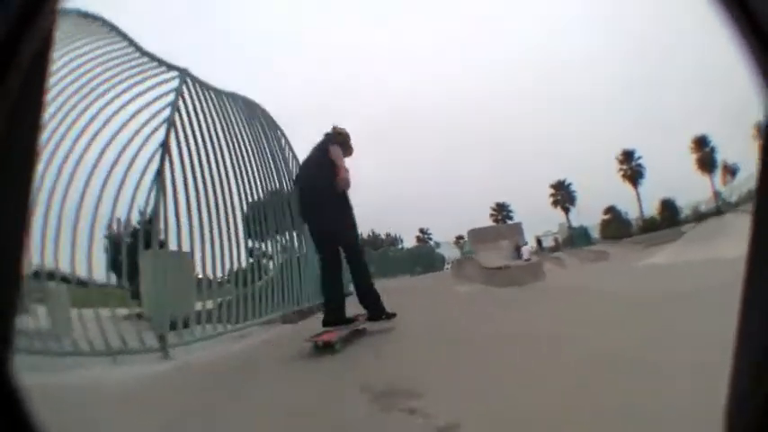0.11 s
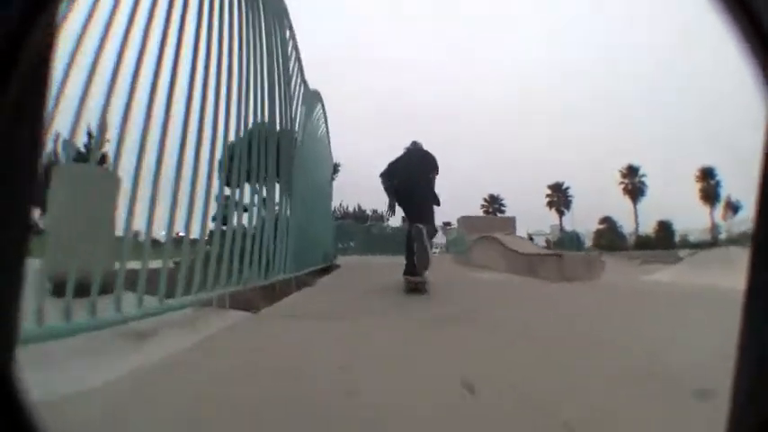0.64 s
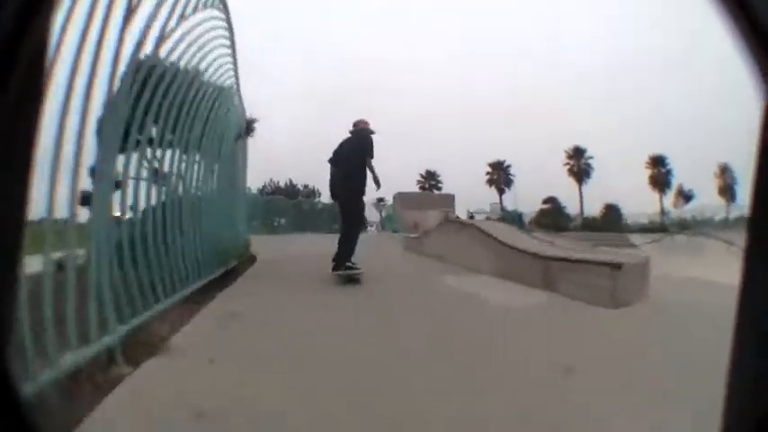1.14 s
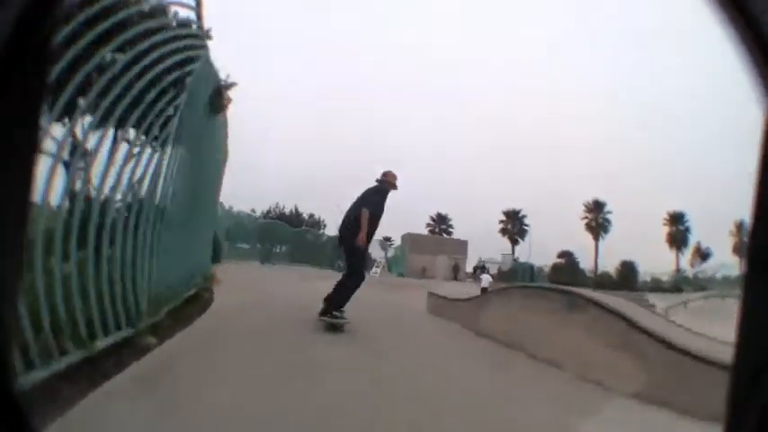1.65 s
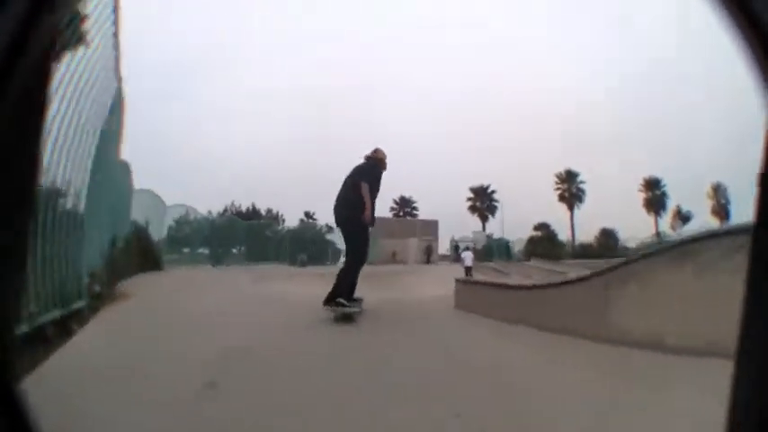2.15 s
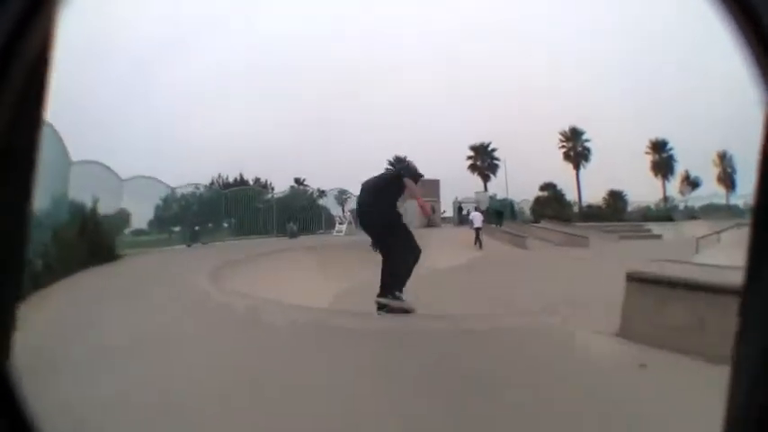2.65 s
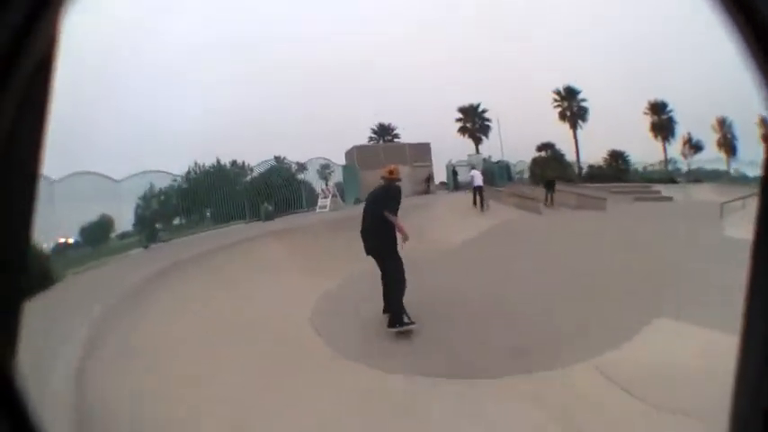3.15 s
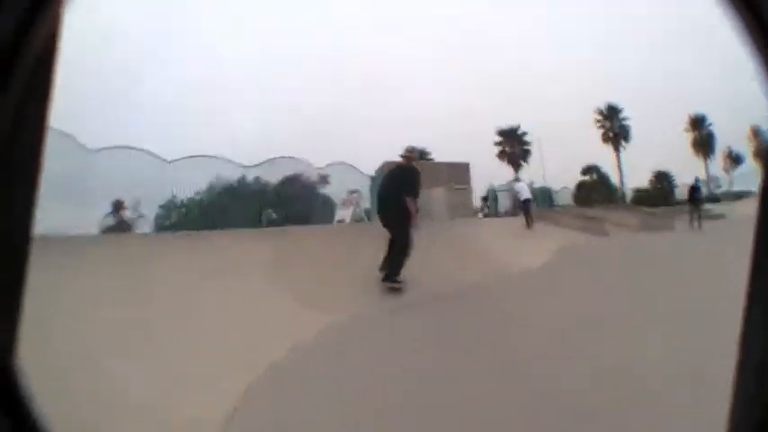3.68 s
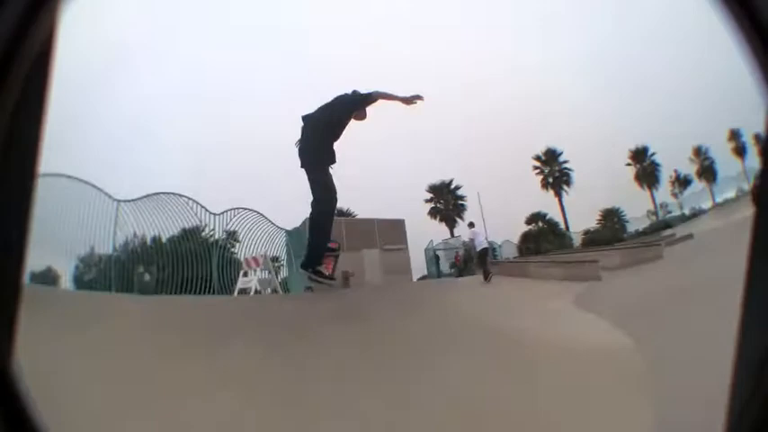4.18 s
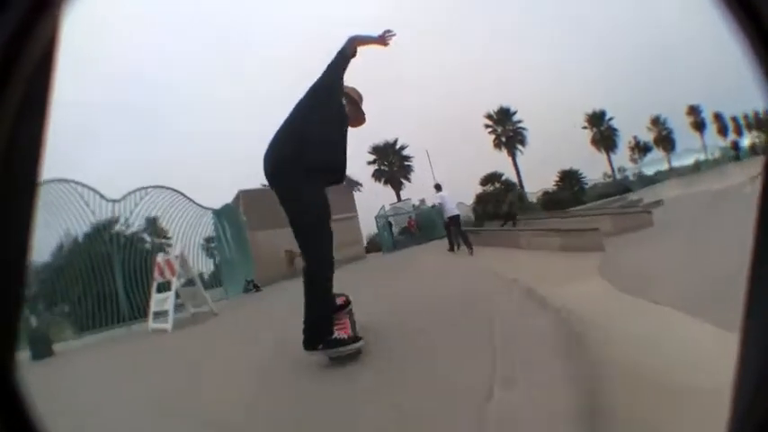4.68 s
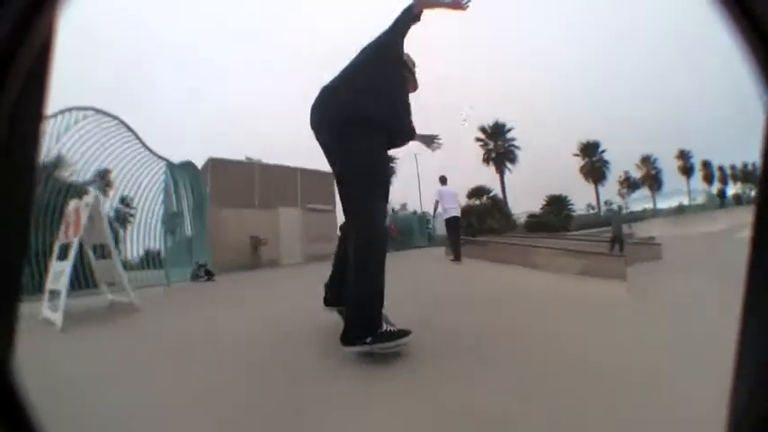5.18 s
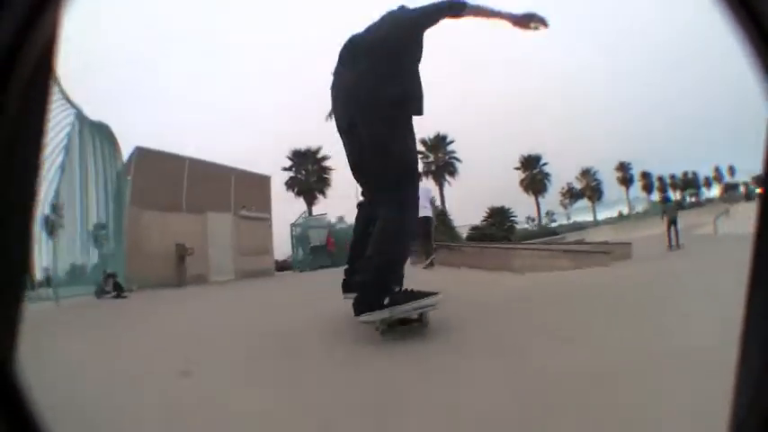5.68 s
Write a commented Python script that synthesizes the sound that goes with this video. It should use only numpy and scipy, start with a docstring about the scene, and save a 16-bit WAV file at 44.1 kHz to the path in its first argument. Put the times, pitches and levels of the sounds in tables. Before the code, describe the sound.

Close, dry sound of skateboarding on open concrete: steady grainy rolling, wavering in tone as weight shifts, with hiss from the bearings. Short rattling clacks of deck and metal trucks come thickly at first, later sparsely. Three hard bursts stand out, the middle one loudest and woodiest, each with the roll briefly dipping around it. Slight wind buffets the microphone, strongest at the very start; the roll carries on to the end.

```python
"""Skateboards roll over smooth concrete in the open, heard close to the ground, among gusts from the start.
Throughout, grit under the wheels shakes deck, trucks and slab, and bearings hiss: noise through resonances.
Quick clacks of seams come first; short rattling forces on the same board make every blow, some with a thump.
Hard blows cluster near 1.2 s, 3.5 s (the strongest knock) and 4.9 s, with sparser clacks between.
The hardest overload the microphone input; lighter clacks and the roll lead to the end."""
import sys
import numpy as np
from scipy import signal
from scipy.fft import rfft, irfft
from scipy.io import wavfile
from scipy.ndimage import uniform_filter1d

SR = 44100
rng = np.random.default_rng(int(sys.argv[2]) if len(sys.argv) > 2 else 0)


def unload_audio(sound):
    """Save the sound as a 16-bit wav file, at the path given as the first command line argument."""
    columns = np.transpose(np.atleast_2d(sound))
    # keep every value between -1 and 1, then stretch to whole-number steps
    steps = np.round(np.clip(columns, -1, 1) * 32767)
    wavfile.write(sys.argv[1], SR, steps.astype(np.int16))


def linear_from_db(decibels):
    """Turn decibels (scalar or array-like) into linear amplitude factors; 0 gives 1."""
    return 10 ** (np.asarray(decibels, float) / 20)


N = 256662   # length [samples]


def rms_one(x):
    """Normalization: scale to unit rms."""
    return x / np.sqrt(np.mean(x ** 2) + 1e-20)


def in_time(rows):
    """Linear interpolation: the columns of a time table, one value a sample."""
    s, *columns = np.transpose(rows)
    return [np.interp(np.arange(N) / SR, s, column) for column in columns]


def coloured(x, points):
    """Spectral shaping: weight the spectrum by a (frequency [Hz], gain [dB]) curve on a log-frequency axis."""
    hz, db = np.transpose(points)
    bins_hz = np.maximum(np.arange(N // 2 + 1) * SR / N, 1)
    gain_db = np.interp(np.log(bins_hz), np.log(np.maximum(hz, 1)), db)
    return irfft(rfft(x) * linear_from_db(gain_db), N)


def cut(x, hz, kind):
    """Band limiting: second-order Butterworth high- or low-pass."""
    return signal.sosfilt(signal.butter(2, hz, kind, fs=SR, output="sos"), x)


def drift(pole_hz):
    """Slow random modulation: white noise through two equal low-pass poles, scaled to unit rms."""
    r = np.exp(-2 * np.pi * pole_hz / SR)
    slow = signal.lfilter([1], [1, -2 * r, r * r], rng.standard_normal(N + SR))
    return rms_one(slow[SR:])   # the first second lets the filter settle


# gusts on the microphone ports: (start of the hold [s], relative peak level [dB], hold [s])
GUSTS = [(0, -17, .34), (.42, -36, .5), (1.82, -31, .13), (2.12, -43, .15), (2.73, -38, 0.12),
         (2.92, -33, .15), (3.37, -23, .12), (3.58, -38, 0.064), (3.72, -25, 0.18), (4.0, -32, .16),
         (5.0, -39, 0.16), (5.17, -33, .28), (5.6, -42, .15)]
# spectrum of the wind noise: (frequency [Hz], relative level per Hz [dB])
WIND_SPECTRUM = [(30, -30), (70, -25), (110, -17), (180, -6), (300, 0), (550, -8.5), (1000, -14),
                 (2000, -27), (5000, -57)]
GUST_RISE_DB_PER_S, GUST_FALL_DB_PER_S, CALM_DB = 500, 500, -62


def breeze():
    """Turbulent pressure: lumpy noise, its own on each port; gusts rise, hold and fall out of a calm."""
    t = np.arange(N) / SR
    gusts = []
    for s, peak_db, hold_s in GUSTS:
        rise_db = GUST_RISE_DB_PER_S * np.maximum(s - t, 0)
        fall_db = GUST_FALL_DB_PER_S * np.maximum(t - s - hold_s, 0)
        gusts.append(peak_db - rise_db - fall_db)
    gust_db = np.maximum(np.max(gusts, axis=0), CALM_DB)
    shared_db = 3.0 * drift(22)
    own_db = 0.5 * np.array([drift(14.0), drift(7.1)])   # one row a port
    lumps = linear_from_db(gust_db + shared_db + own_db)
    return lumps * rms_one(coloured(rng.standard_normal((2, N)), WIND_SPECTRUM))


def resonate(force, modes, favoured_hz=1000, lift_db=0, waver_db=0):
    """Modal superposition: parallel resonances, driven harder near the favoured pitch; each may waver."""
    out = 0
    for hz, width_hz, db in modes:
        # widened so that two passes give the width
        r = np.exp(-np.pi * max(width_hz, 20) / np.sqrt(np.sqrt(2) - 1) / SR)
        b = (1 - r * r) / 2 * np.array([1, 0, -1])
        a = [1, -2 * r * np.cos(2 * np.pi * hz / SR), r * r]
        force = force * rng.choice([-1., 1.], N)   # four wheels: each mode is pushed or pulled in its own way
        nearness = np.exp(-(np.log(hz / favoured_hz) / 0.15) ** 2)
        drive_db = db + lift_db * nearness
        if waver_db:
            drive_db = drive_db + waver_db * drift(6.2)
        once = signal.lfilter(b, a, linear_from_db(drive_db) * force)
        out = out + signal.lfilter(b, a, once)   # twice: steep flanks
    return out


# resonances of the slab underneath: (frequency [Hz], width [Hz], relative drive [dB])
SLAB_MODES = [(150, 77, -7), (251, 194, 1), (324, 145, -1.5)]


def slab(force):
    """Forced vibration: the ground booms in a band of low resonances."""
    return cut(cut(resonate(force, SLAB_MODES), 114, "high"), 453, "low")


# the hollow in the hiss: (time [s], cancelled frequency [Hz], strength of the bounce [0-1])
HOLLOW_PATH = [(0, 6960, 0.6), (.6, 6800, 0.9), (.9, 8000, 0.6), (1.15, 7960, 0.5), (1.8, 6750, 0.44),
               (2.4, 7300, 0.7), (2.8, 7900, .7), (2.95, 6540, 0.3), (3.15, 6800, 0.3), (3.6, 7400, 0.5),
               (3.95, 7300, .7), (4.3, 7750, 0.7), (4.7, 8100, 0.43), (5.82, 7500, 0.4)]


def bounced(x):
    """Interference: a copy off the concrete, late by half a period of the hollow, cancels there."""
    hz, strength = in_time(HOLLOW_PATH)
    at = np.arange(N)
    copy = np.array([np.interp(at - SR / (2 * hz), at, row) for row in x])
    return x + np.clip(strength, 0, 1) * copy


# spectrum of the bearing hiss: (frequency [Hz], relative level per Hz [dB])
HISS_SPECTRUM = [(3000, -5), (5000, 1), (6500, -3.5), (8000, 1), (10800, 0), (12900, -5), (14800, -3.5),
                 (16100, -13)]


def bearing_hiss(force):
    """Broadband radiation: the force shaped to a hiss, heard directly and off the concrete."""
    return bounced(coloured(force, HISS_SPECTRUM))


# resonances of deck and trucks, each in a low and a high group:
# (frequency [Hz], width [Hz], relative drive [dB])
DECK_LOW_MODES = [(367, 311, -3.5), (505.8, 85, 2), (635, 89, -6.5)]
DECK_HIGH_MODES = [(656, 196, -3), (790, 95, -10), (870, 180, -8)]
TRUCK_LOW_MODES = [(1088, 166, 0), (1320, 136, 3), (1542, 286, -1)]
TRUCK_HIGH_MODES = [(1780, 220, -1), (2196, 240, -5.5), (2636, 256, -8), (3110, 360, -11),
                    (3450, 300, -13.5), (4020, 1100, -19), (4950, 1050, -26.5), (6100, 640, -26.5)]


def board(deck_force, truck_force, deck_lift=1, truck_lift=1, **drive):
    """Forced vibration: deck and trucks ring in their own modes; the lifts scale the high groups."""
    deck = resonate(deck_force, DECK_LOW_MODES, **drive)
    deck = deck + deck_lift * resonate(deck_force, DECK_HIGH_MODES, **drive)
    trucks = resonate(truck_force, TRUCK_LOW_MODES, **drive)
    trucks = trucks + truck_lift * resonate(truck_force, TRUCK_HIGH_MODES, **drive)
    return deck, trucks


def grit(per_s, spread_db):
    """Poisson-like excitation: grains pass under the wheels as random clicks, a few much bigger."""
    sizes = linear_from_db(spread_db * np.minimum(rng.exponential(1, N), 5))
    return sizes * (rng.random(N) < per_s / SR)


# brief level changes of the roll, mostly dips, around hard blows:
# (start [s], deck and ground change [dB], trucks and hiss change [dB], recovery [s])
ROLL_DIPS = [(.43, 1.5, -3.5, 0.036), (1.235, -6.5, -4.5, 0.07), (1.3, -7, -16.5, 0.038),
             (1.35, -13, -19, 0.17), (3.23, -1, -4.5, 0.068), (3.344, -3.5, -8.5, 0.11),
             (3.505, 2, -10, 0.043), (4.892, -12, -22, 0.094), (4.974, -11, -16, 0.16), (5.3, -5, -3, 0.05)]
DIP_FALL_S = 0.029


def dips():
    """Level modulation: each change sets in quickly and returns evenly in dB; rows for low and high parts."""
    t = np.arange(N) / SR
    total_db = np.zeros((2, N))
    for s, low_db, high_db, back_s in ROLL_DIPS:
        depth = np.interp(t - s, [0, DIP_FALL_S, DIP_FALL_S + back_s], [0, 1, 0])
        total_db += np.array([[low_db], [high_db]]) * depth
    return total_db


# the stance shifts which mode rings most: (from time [s], favoured frequency [Hz], lift of the drive [dB])
STANCES = [(0, 1350, 0.5), (.12, 2860, 5), (.4, 1780, 7), (.55, 2670, 2.5), (.72, 1320, 2.5),
           (1.7, 1710, 1.5), (1.95, 1320, 3.5), (2.45, 1500, 1.5), (2.95, 1320, 3), (3.51, 2140, 10.5),
           (3.598, 790, 13.5), (4.3, 813, 10.5), (4.68, 1600, 7), (4.78, 2380, 4), (4.83, 1620, 9),
           (5.05, 1510, 5), (5.3, 2150, 3.5), (5.45, 1750, 3)]
SHIFT_S = 0.013


def stance():
    """Selective excitation: the favoured mode holds until the next shift of the feet."""
    s, hz, lift_db = np.transpose(STANCES)
    now = np.maximum(np.searchsorted(s, np.arange(N) / SR, "right") - 1, 0)
    steps = np.array([hz[now], lift_db[now]])
    return uniform_filter1d(steps, size=int(SHIFT_S * SR), mode="nearest")


# course of the rolling, all levels relative:
# (time [s], force of the grit [dB], load on the deck [dB], brightness [dB], boom of the slab [dB])
ROLL_COURSE = [(0, -20, 12.5, 2.5, -1), (.15, -19.5, -9, 1, 8.5), (.35, -20.5, -4.5, 2.5, 7),
               (.55, -16, -5, 1.5, 2), (.8, -17.5, 9.5, -1.5, 2.5), (1.15, -15.5, 3.5, 0.5, -6),
               (1.6, -17, 6, -2, 0.5), (1.9, -14, 4, -5, -0.5), (2.2, -21.5, 13, 0, -12),
               (2.45, -15.5, 2.5, -1, -27), (2.7, -16.5, 6.5, -7.5, -4), (3.05, -17, 9, 0, 4),
               (3.2, -16.5, 0.5, -3.5, -12), (3.46, -18, 2, -3.5, 8.5), (3.56, -19.5, 9.5, -15.5, -4),
               (4, -16.5, 5, -9.5, 0.5), (4.4, -19, 10.5, -6, -9), (4.7, -20, 3.5, 1, -2),
               (4.86, -17.5, 1.5, 0.5, -9), (5.2, -18.5, 9.5, 0, 7), (5.5, -18.5, 8.5, 3.5, 2.5),
               (5.82, -18, 9, 4, 2)]
UPPER_DECK_DB, UPPER_DECK_SPARED = 5.5, 1   # load booms in the low deck modes; the upper are spared this share
UPPER_TRUCK_FOLLOWS = 0.43   # share of the brightness
HISS_DB, GROUND_DB = -20, -9   # against the force, before brightness, boom and dips


def rolling(signs):
    """Source-filter principle: one stream of grit drives every part; loose hardware adds judder."""
    force_db, load_db, bright_db, boom_db = in_time(ROLL_COURSE)
    low_dip_db, high_dip_db = dips()
    judder_db = 0.33 * drift(13.0) + drift(29)   # deck, trucks and hiss each take a share of it
    favoured_hz, lift_db = stance()
    force = grit(6000, spread_db=2.5) * signs
    deck, trucks = board(force * linear_from_db(0.69 * judder_db), force * linear_from_db(0.67 * judder_db),
                         deck_lift=linear_from_db(UPPER_DECK_DB - UPPER_DECK_SPARED * load_db),
                         truck_lift=linear_from_db(UPPER_TRUCK_FOLLOWS * bright_db),
                         favoured_hz=favoured_hz, lift_db=lift_db, waver_db=1.65)
    ground = slab(force)
    hiss = bearing_hiss(force * linear_from_db(0.6 * judder_db))
    parts = [(deck, -0.5 + load_db + low_dip_db),
             (trucks, high_dip_db),
             (ground, GROUND_DB + boom_db + low_dip_db),
             (hiss, HISS_DB + bright_db + high_dip_db)]
    # each part is scaled by the spread of its mid row
    return sum(linear_from_db(force_db + db) * part / np.std(part[0]) for part, db in parts)


# blows on the board, levels relative within each column:
# (time [s], clack on the trucks [dB], knock on the deck [dB], tick [dB], favoured mode [Hz])
BOARD_BLOWS = [(0.044, -7, -20, -21, 780), (0.0713, -3, -25, -23, 1320), (0.188, -8, -14, -24, 860),
               (0.3058, -3, -1.5, -24, 1630), (0.392, -3, -5, -28, 1355), (0.416, -1, -1, -18, 1680),
               (0.474, -4, -21, -32, 2700), (0.49, -12, -29, -23, 1780), (0.575, -4, -24, -43, 1860),
               (0.652, -13, -31, -49, 915), (0.673, -0.5, -12, -29, 2620), (0.9085, -15, -35, -23, 1890),
               (1.103, -1.5, -14, -34, 2090), (1.2226, 8, 6.5, -15, 2450), (1.2301, 6, 1.5, -13, 677),
               (1.29, 6.5, -1, -18, 1250), (1.338, 2, 1.5, -22, 2900), (1.353, -10, -18, -34, 890),
               (1.6178, -4, -24, -24, 1280), (1.8776, -9, -19, -26, 3570), (2.149, -8, -10, -38, 1230),
               (2.2136, -9, 7.5, -32, 1190), (2.332, -8, 3, -21, 790), (2.4742, 1, -25, -25, 3300),
               (2.7513, -2.5, -21, -30, 1270), (3.1538, 5.5, -7, -24, 3320), (3.182, -1, -31, -41, 1770),
               (3.265, 3.5, -3, -23, 2600), (3.307, -2.5, -8, -36, 2520), (3.3386, -13, -5, -39, 1510),
               (3.478, 9.5, 17.5, -22, 2260), (3.4871, 11, 9, -22, 675), (3.4961, 11.5, 7, -26, 685),
               (3.516, -13, -6, -41, 900), (3.569, -17, -7, -42, 950), (3.719, -3, -5, -49, 2200),
               (4.2609, -1, -3, -46, 830), (4.315, -7.5, -5, -34, 860), (4.4956, -7, -8, -30.5, 774),
               (4.729, -2, -32, -42, 1710), (4.8015, -3, -20, -36, 2000), (4.8489, -1, -0.5, -22, 1640),
               (4.869, 9.5, -0.5, -11, 2880), (4.8751, 12.5, 2, -12, 844), (4.907, -7, -9, -34, 2200),
               (4.95, -10, -9, -36, 1950), (4.9755, -1.5, -12, -23, 1350), (5.097, -11, -4, -34, 1780),
               (5.243, -1, -24, -19, 1130), (5.2764, -3.5, -24, -19, 1630), (5.6777, 0, -17, -53, 2540)]
# low thumps, mostly under blows: (time [s], relative level [dB])
LOW_THUMPS = [(0.3062, -20), (1.2222, -33), (1.291, -36), (1.6175, -28), (2.2127, -20), (2.331, -44),
              (2.4745, -33), (2.9307, -21), (3.478, -24), (3.4967, -34), (4.3145, -24), (4.869, -21)]
CONTACT_S, CONTACT_RISE_S = 0.005, .0012   # time constants


def blows(noise):
    """Impact excitation: a first strike and a short rattling contact that dies away, into the same board."""
    deck_force, truck_force, tick_force, thump_force = forces = np.zeros((4, N + SR))
    strikes, struck_hz = np.zeros(N), np.ones(N)
    t = np.arange(int(3 * CONTACT_S * SR)) / SR
    contact = np.exp(-(t / CONTACT_S) ** 2) * (1 - 0.64 * np.exp(-t / CONTACT_RISE_S))
    for s, clack_db, knock_db, tick_db, hz in BOARD_BLOWS:
        at = round(s * SR)
        forces[:3, at:at + len(contact)] += linear_from_db(np.array([[knock_db], [clack_db], [tick_db]])) * contact
        strikes[at + round(CONTACT_RISE_S * SR)] = linear_from_db(11.5)
        struck_hz[at:] = hz   # where the blow lands decides which mode it favours
    for s, thump_db in LOW_THUMPS:
        at = round(s * SR)
        thump_force[at:at + len(contact)] += linear_from_db(thump_db) * contact
    rattle = noise + strikes
    deck, trucks = board(linear_from_db(15.5) * deck_force[:N] * rattle, linear_from_db(4) * truck_force[:N] * rattle,
                         favoured_hz=struck_hz, lift_db=9.5)
    tick = cut(cut(linear_from_db(-0.5) * tick_force[:N] * noise, 6200, "high"), 16000, "low")
    thump = cut(cut(linear_from_db(2.5) * thump_force[:N], 120, "low"), 53, "high")   # the smooth pulse, without rattle
    return deck + trucks + tick + thump


# unrelated share between the ports: (frequency [Hz], gain of the side signal [dB])
SIDE_GAIN = [(60, -70), (300, -52), (640, -36), (1400, -24.5), (3100, -19.5), (5000, -8.5), (7000, -3),
             (11000, -3), (15000, -2)]


def at_ports(mid, side):
    """Partial coherence: the ports hear the board nearly alike; an unrelated share widens the treble most."""
    side = coloured(side, SIDE_GAIN)
    return np.array([mid + side, mid - side])


def scene():
    """Superposition: breeze, rolling and blows add at the two ports."""
    wind = breeze()
    roll = rolling(rng.choice([-1., 1.], (2, N)))
    mid, side = roll + blows(rng.standard_normal((2, N)))
    return at_ports(mid, side) + wind


def top_cut(x):
    """Nothing passes above the cut-off."""
    return signal.sosfilt(signal.butter(12, 16250, fs=SR, output="sos"), x)


def record(dry):
    """Saturation: the microphone input clips hard at full scale."""
    mix = np.clip(dry, -1, 1)
    return top_cut(mix)


dry = scene()
out = record(dry)
unload_audio(out)
```